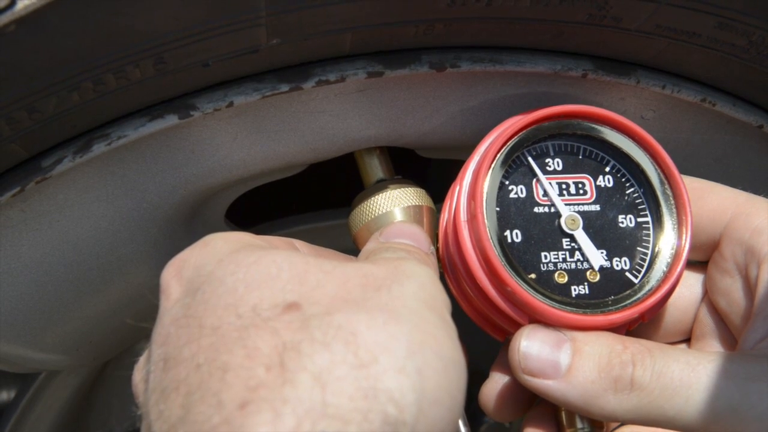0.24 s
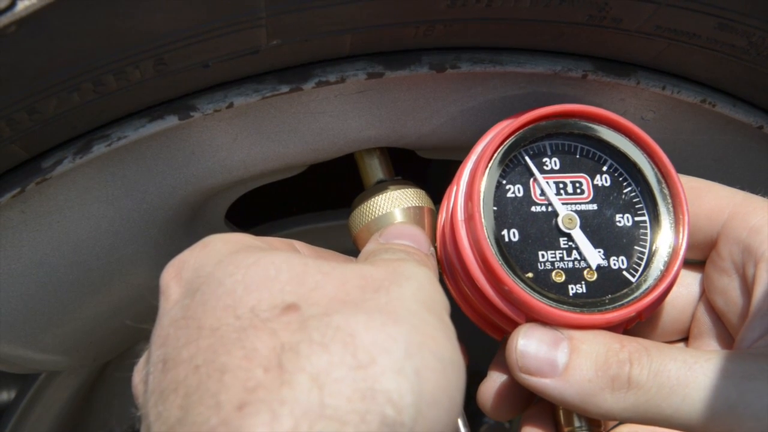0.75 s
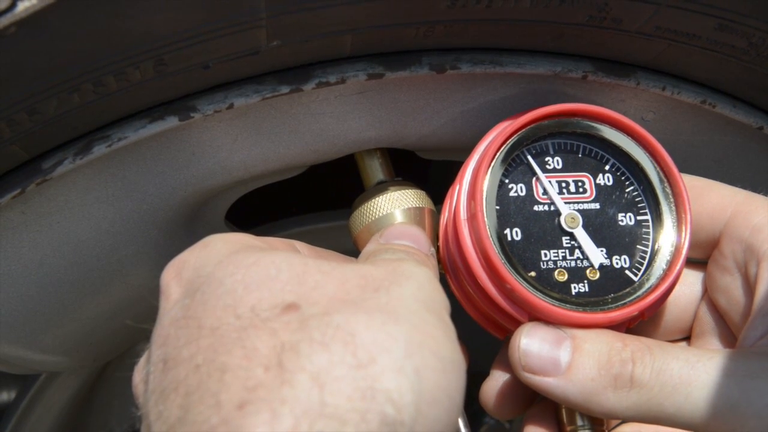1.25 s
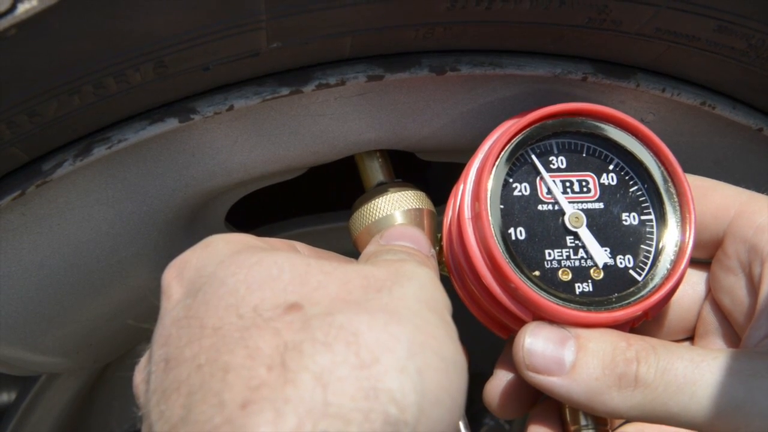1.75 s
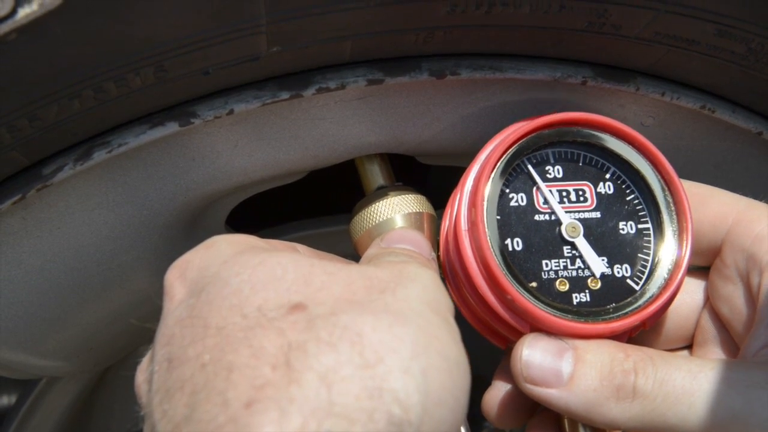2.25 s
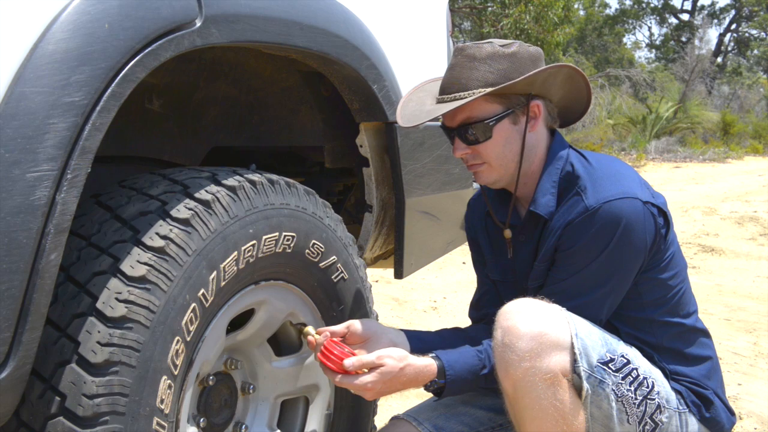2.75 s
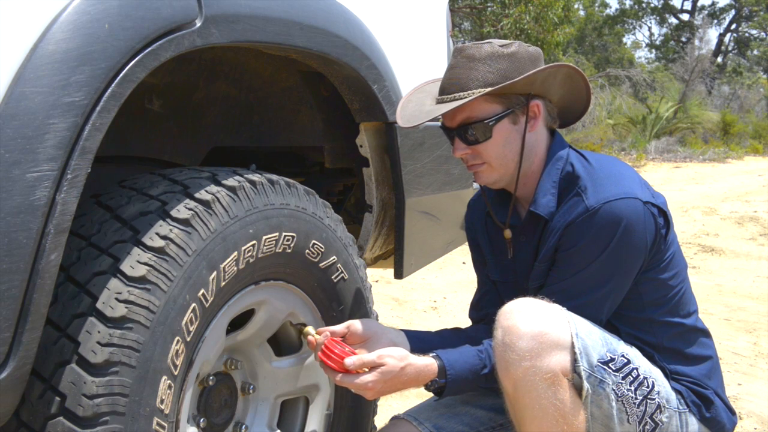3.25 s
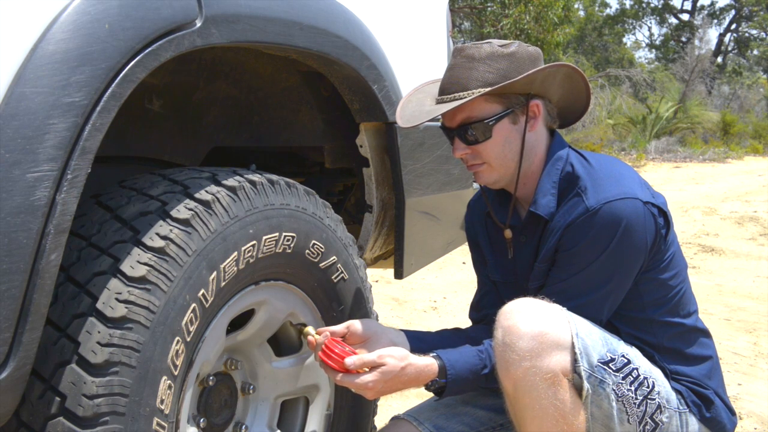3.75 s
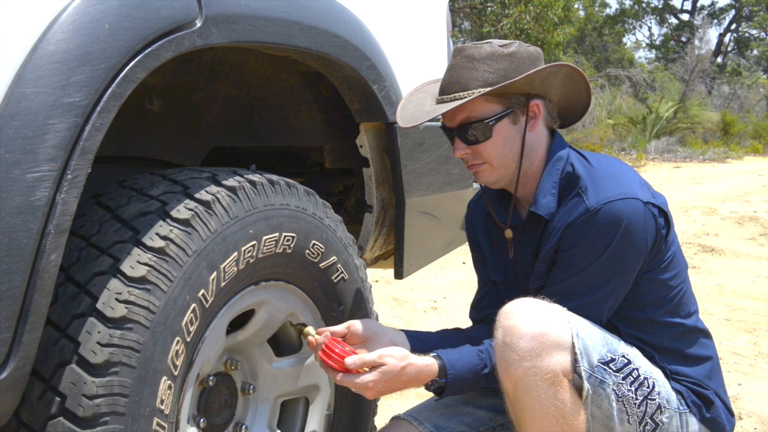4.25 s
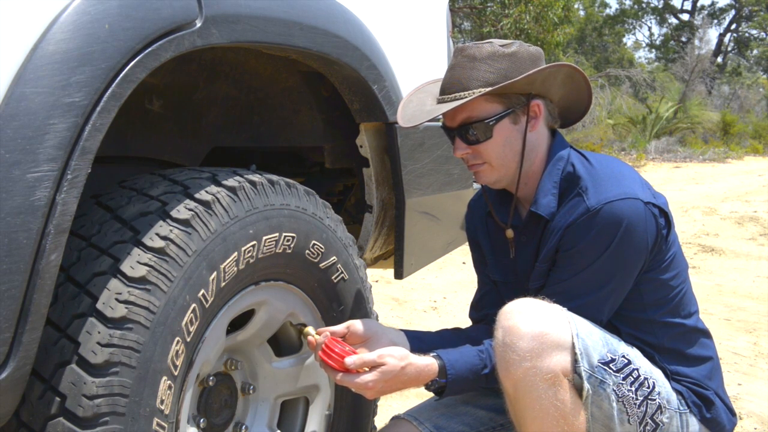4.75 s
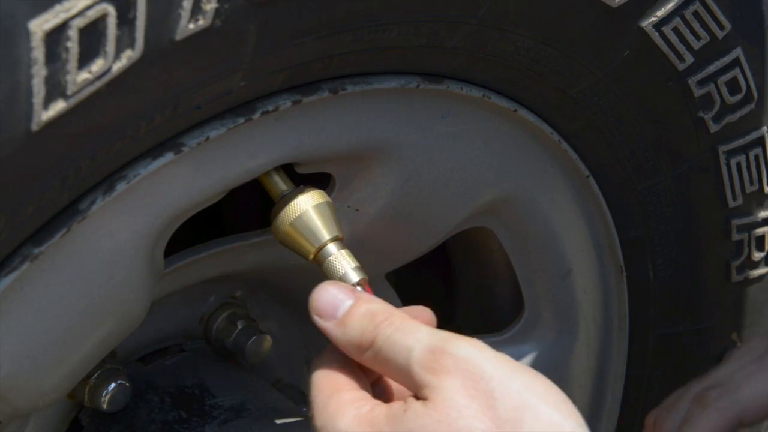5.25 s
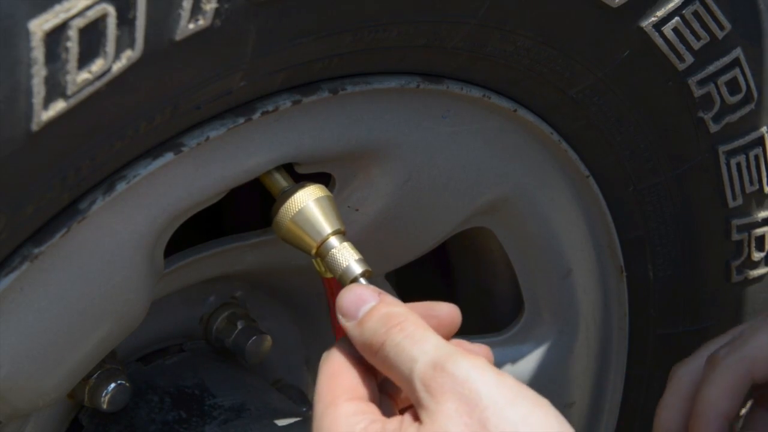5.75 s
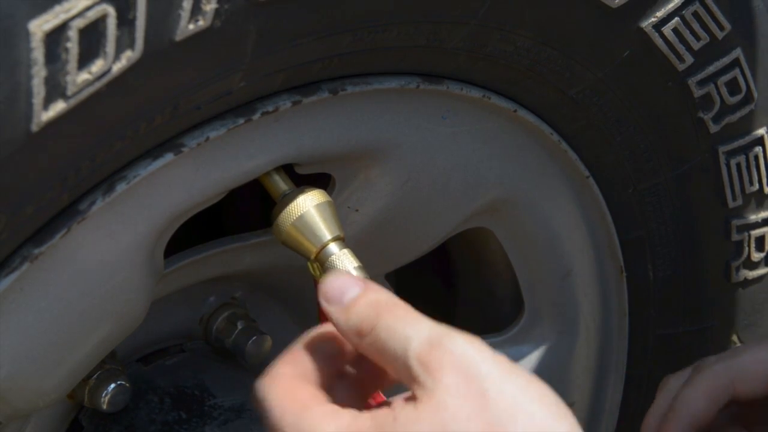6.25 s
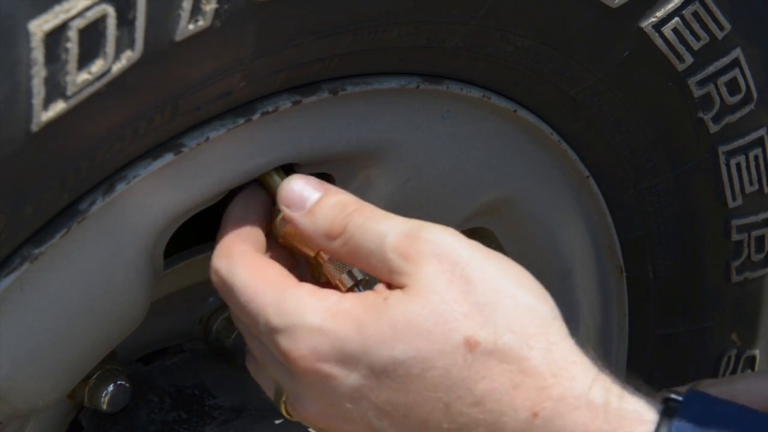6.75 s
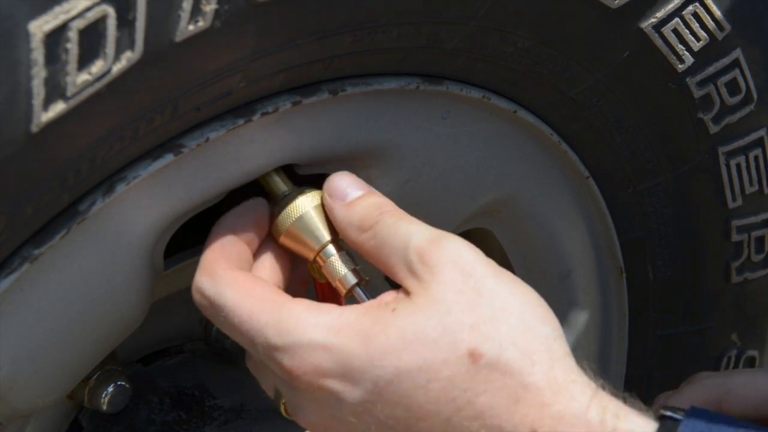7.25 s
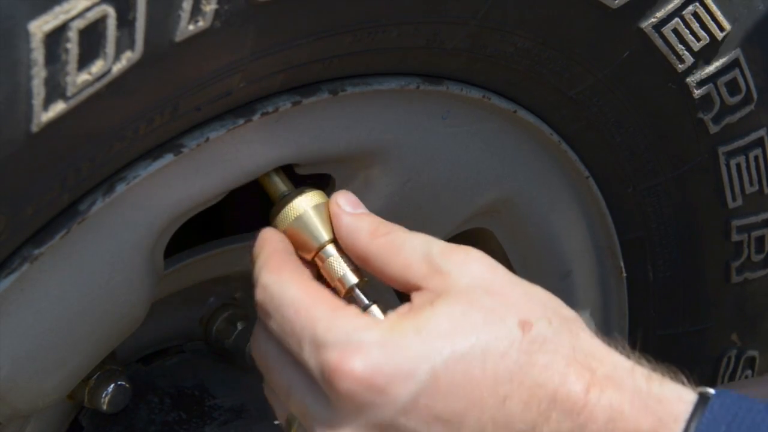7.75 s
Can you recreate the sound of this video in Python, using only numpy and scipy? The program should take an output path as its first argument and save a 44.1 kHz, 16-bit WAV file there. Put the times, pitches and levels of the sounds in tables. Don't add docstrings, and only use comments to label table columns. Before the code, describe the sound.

Pressurised air jets from a tyre valve in a constant sharp hiss until it abruptly shuts near the end, with light wind buffeting the microphone.

```python
import sys
import numpy as np
from scipy import signal
from scipy.fft import rfft, irfft, next_fast_len
from scipy.io import wavfile
from scipy.ndimage import uniform_filter1d

SR = 44100
rng = np.random.default_rng(int(sys.argv[2]) if len(sys.argv) > 2 else 0)


def attenuation_scalar(level_db):
    decades = np.asarray(level_db, float) / 20
    return 10 ** decades


def log_audio(samples):
    frames = np.atleast_2d(samples).T
    limited = np.clip(frames, -1, 1)
    pcm = np.round(limited * 32767).astype(np.int16)
    wavfile.write(sys.argv[1], SR, pcm)


N = 353461
FRAME, GRID = 2048, 510
TOP_HZ = 15740


def slope(hz, points):
    at_hz, db = np.transpose(points)
    return np.interp(np.log(hz + 1), np.log(at_hz), db)


def coloured(db_at, flutter=1.):
    size = next_fast_len(N)
    hz = np.arange(size // 2 + 1) * SR / size
    spectrum = rfft(flutter * rng.standard_normal(N), size)
    x = irfft(spectrum * attenuation_scalar(db_at(hz)), size)[:N]
    return x / np.std(x)


def walk(rate_hz):
    hold = int(SR / rate_hz)
    steps = np.repeat(rng.standard_normal(N // hold + 1), hold)
    slewed = uniform_filter1d(uniform_filter1d(steps, hold), hold)
    return 0.73 * slewed[:N]


def jet(t):
    # (time [s], level [dB])
    flow = [
        (0.0, -13.5),
        (0.04, -14.5),
        (7.4, -14.5),
        (7.86, -14.5),
    ]
    # (time [s], level [dB], gain of the low part of the hiss [dB])
    closing = [
        (7.872, -15.5, 0),
        (7.885, -13, -2.5),
        (7.896, -11.5, -4),
        (7.915, -17, .6),
        (7.921, -21, -5),
        (7.93, -27, -6),
        (7.939, -43, -5),
        (7.945, -70, -5),
    ]
    s, db = np.transpose(flow + [row[:2] for row in closing])
    closing_s, _, closing_low_db = np.transpose(closing)
    low_db = np.interp(t, closing_s, closing_low_db) + 0.28 * walk(5.2)
    flutter_db = 0.39 * walk(13) + 0.48 * walk(90) + 0.31 * walk(600)
    hiss = coloured(wheel, attenuation_scalar(flutter_db))
    low = signal.sosfiltfilt(signal.butter(1, 5500, fs=SR, output="sos"), hiss)
    return attenuation_scalar(np.interp(t, s, db)) * (hiss + (attenuation_scalar(low_db) - 1) * low)


def wheel(hz):
    # (frequency [Hz], level per Hz [dB])
    jet_spectrum = [(300, -27.3), (520, -27.0), (640, -15.5), (1100, -18.4), (2300, -6.7), (4700, -11.9),
                    (6500, -7.0), (8000, -4.5), (10800, 0.0), (13000, -2.1), (14500, -7.8), (15650, -7.8)]
    # (centre [Hz], width [Hz], height [dB])
    ridges_and_dips = [(407, 145, 1.6), (595, 98, 3.7), (664, 82, 1.5), (916, 102, 6.3), (1163, 40, 1.2),
                       (1339, 187, 4.6), (1676, 121, 4.1), (1843, 60, 1.5), (1932, 75, 1.5), (2102, 48, 1.3),
                       (2291, 107, 2.6), (2537, 55, 2.7), (3049, 57, 1.9), (3250, 83, 3.1), (3343, 59, 1.8),
                       (3486, 184, 6.8), (3610, 76, 2.0), (4110, 394, 3.0), (4473, 235, 3.3), (5122, 179, 2.4),
                       (6016, 579, 3.0), (6653, 300, 2.9), (8381, 106, 1.2), (8958, 108, 2.7), (9350, 170, 3.1),
                       (12321, 112, 2.0), (13939, 240, 2.7), (14725, 330, 3.1),
                       (340, 42, -2.4), (487, 127, -3.9), (720, 78, -2.1), (836, 98, -4.5), (1237, 108, -2.7),
            (1469, 92, -2.7), (1785, 48, -1.9), (1882, 54, -1.3), (2011, 213, -2.1), (2103, 352, -3.0),
            (2173, 171, -2.9), (2611, 152, -4.3), (2789, 194, -4.2), (3109, 105, -3.2), (3414, 52, -0.7),
            (3942, 134, -2.2), (4940, 131, -2.1), (6426, 244, -5.6), (6861, 186, -4.6), (7140, 162, -5.0),
            (7743, 221, -6.9), (8068, 305, -4.6), (8698, 248, -3.4), (9072, 250, -4.2), (9750, 392, -2.6),
            (11648, 557, -2.1), (13260, 287, -3.7), (14926, 183, -2.4),
                       (2700, 70, 2), (5715, 140, 2.5), (8570, 95, 2), (10120, 180, 1.5), (10790, 150, 1.5),
             (10920, 100, -1.8), (11125, 180, 1.2), (11480, 120, 1.5), (11830, 140, 1.5), (13630, 140, 1.8)]
    ripple_db = 0
    for at_hz, width_hz, db in ridges_and_dips:
        ripple_db = ripple_db + db / (1 + (2 * (hz - at_hz) / width_hz) ** 2) ** 2
    return slope(hz, jet_spectrum) + 1.08 * ripple_db


def wind(t):
    # (peak time [s], peak level [dB], length [s], extra sharpness [dB])
    puffs = [(.59, -44, .07, 0), (.655, -47, .04, 10), (.73, -42, .07, -3), (.885, -41, .05, 2),
             (.94, -42, .12, 3), (1.1, -37.5, .07, -1), (1.157, -39, .04, 0), (1.29, -44, .12, 0),
             (1.39, -40, .14, 3), (1.46, -44, .1, 3), (1.537, -34.5, 0.099, 1), (1.815, -45, .07, -5),
             (1.97, -46, .07, 1), (2.04, -39.5, 0.084, 1), (2.265, -39, 0.15, -8), (2.357, -37, .14, 5),
             (2.445, -40, .04, -3), (2.575, -46, .1, 2), (2.73, -48, .17, 0), (2.845, -42, .08, -3),
             (2.97, -48, .16, 3), (3.08, -45, .09, 3), (3.48, -41.5, .09, 1), (3.86, -47, .1, 4),
             (3.96, -42, .14, 0), (4.18, -47, .1, 2), (4.625, -44, .14, 4), (5.14, -46, .1, 0),
             (7.89, -56, .08, 16), (8.0, -54, .11, 19)]
    rise_share, fall_share = 0.36, 0.27
    slap_at_db, slap_growth, flick_growth = -45, 1.65, 3.3
    puff_power, sharp_power = 0, 0
    for peak_s, db, length_s, sharpness_db in puffs:
        width_s = length_s * np.where(t < peak_s, rise_share, fall_share)
        swell = attenuation_scalar(2 * db) * np.exp(-((t - peak_s) / width_s) ** 2)
        puff_power = puff_power + swell
        sharp_power = sharp_power + attenuation_scalar(2 * sharpness_db / slap_growth) * swell
    calm_db = -59 + 4.5 * walk(6)
    rumble_gain = np.sqrt(puff_power + attenuation_scalar(2 * calm_db))
    sharp = np.sqrt(sharp_power) / attenuation_scalar(slap_at_db)
    slap_calm_db = -63.5 + 2.5 * walk(8)
    slap_gain = np.hypot(attenuation_scalar(slap_at_db - 11.5) * sharp ** slap_growth, attenuation_scalar(slap_calm_db))
    flick_gain = attenuation_scalar(slap_at_db - 35.5) * sharp ** flick_growth
    rumble = buffet([(10, -36), (30, -13), (55, 1.0), (102, -0.5), (150, -13), (400, -49)])
    slap = buffet([(60, -43), (120, 0.0), (160, 7.5), (260, -7.0), (400, -21), (700, -40)])
    flick = buffet([(150, -40), (250, 2), (380, -3), (520, -40)])
    return rumble_gain * rumble + slap_gain * slap + flick_gain * flick


def buffet(points):
    x = coloured(lambda hz: slope(hz, points))
    local_rms = np.sqrt(uniform_filter1d(x ** 2, size=SR // 20))
    return attenuation_scalar(1.4 * walk(40)) * x / local_rms


def field():
    # (frequency [Hz], level per Hz [dB])
    field_spectrum = [(20, -8), (100, -5), (400, -4), (650, -2), (1000, -5), (2200, -13), (4800, -16),
                      (7000, -9), (10000, -7), (13000, -15), (15500, -23)]
    field_db, ring_hz, ring_db = -52.5, 1690, -62.5
    ring = attenuation_scalar(ring_db + walk(30)) * np.sin(2 * np.pi * ring_hz * np.arange(N) / SR)
    return attenuation_scalar(field_db) * coloured(lambda hz: slope(hz, field_spectrum)) + ring


def scene():
    t = np.arange(N) / SR
    return np.tile(jet(t) + wind(t) + field(), (2, 1))


def fills():
    chance, tries, until_s = 0.135, 3, 7.8
    low_hz, wide_hz, wide_share, low_bias = 4220, 1700, 0.23, 1.2
    starts = np.arange(GRID, int(until_s * SR), FRAME // 2)
    pick = rng.random((len(starts), tries))
    place = rng.random((len(starts), tries))
    first = np.arange(tries) == 0
    used = (pick[:, :1] < chance) & ((pick < 1 / 4) | first)
    low = low_hz + place[used] ** low_bias * (TOP_HZ - wide_hz / 2 - low_hz)
    high = low + np.minimum(wide_share * low, wide_hz)
    return zip(starts[np.nonzero(used)[0]], low, high)


def roll_off(x):
    return signal.sosfilt(signal.butter(12, 16960, fs=SR, output="sos"), x)


def record(dry):
    fill_db = 1
    dry = signal.sosfilt(signal.ellip(16, .1, 90, TOP_HZ, fs=SR, output="sos"), dry)
    out = dry.copy()
    hz = np.arange(FRAME // 2 + 1) * SR / FRAME
    window = signal.windows.kaiser_bessel_derived(FRAME, 4 * np.pi)
    for start, low, high in fills():
        span = slice(start, start + FRAME)
        inside = (hz > low) & (hz < min(high, TOP_HZ))
        band = irfft(rfft(window * dry[:, span]) * inside)
        fill = irfft(rfft(window * rng.standard_normal((2, FRAME))) * inside)
        fill *= attenuation_scalar(fill_db) * np.std(band) / np.std(fill)
        out[:, span] += window * (fill - band)
    return roll_off(out)


dry = scene()
out = record(dry)
log_audio(out)
```